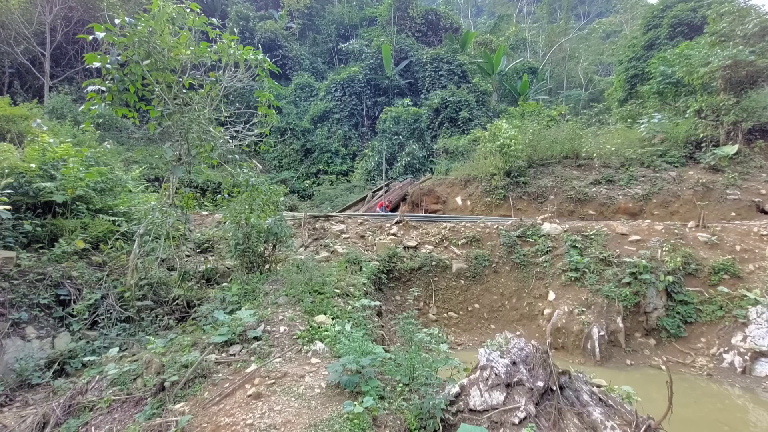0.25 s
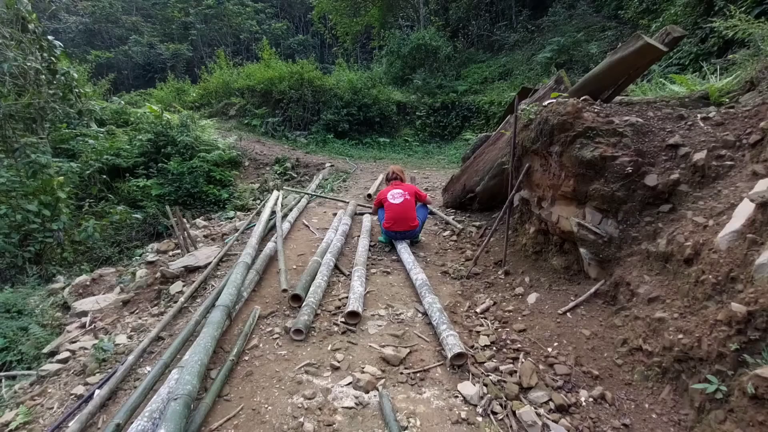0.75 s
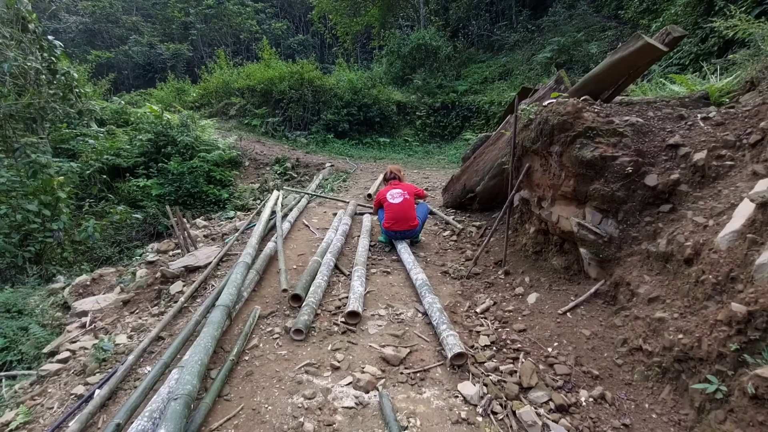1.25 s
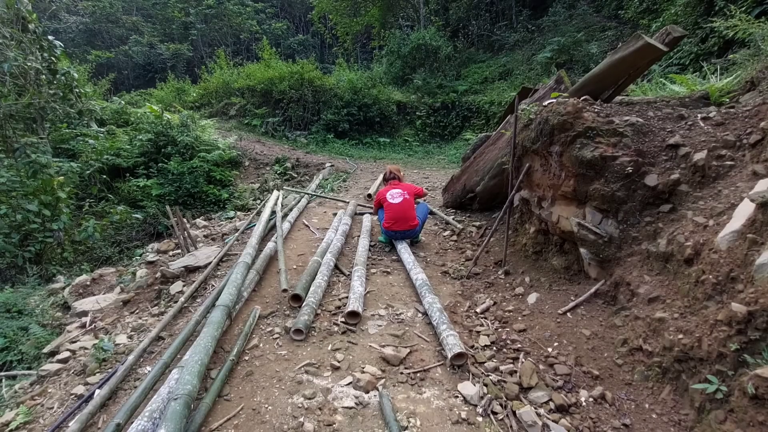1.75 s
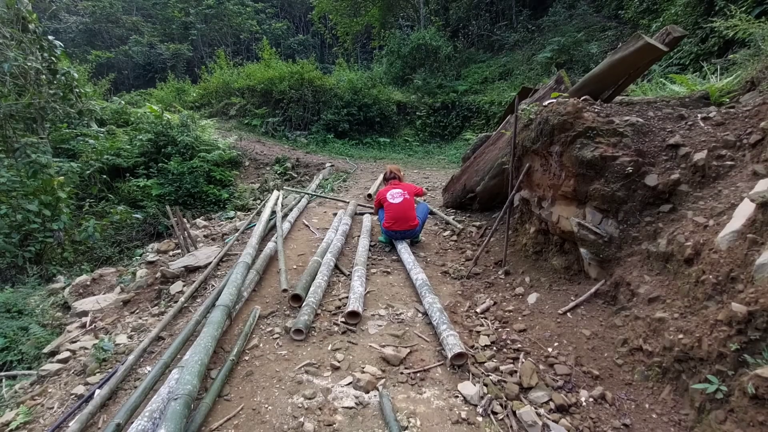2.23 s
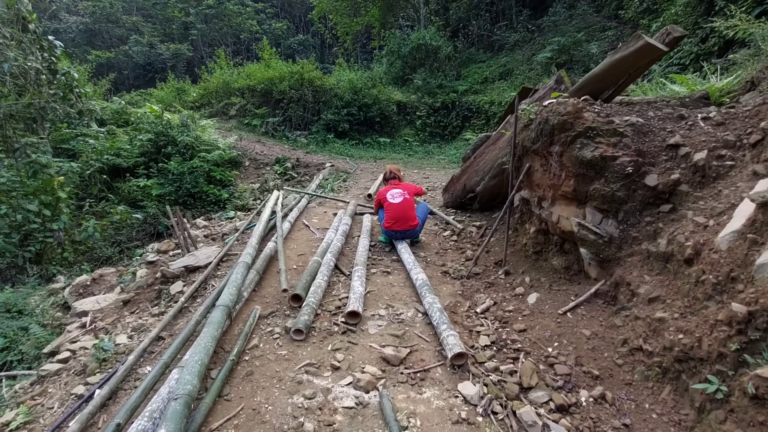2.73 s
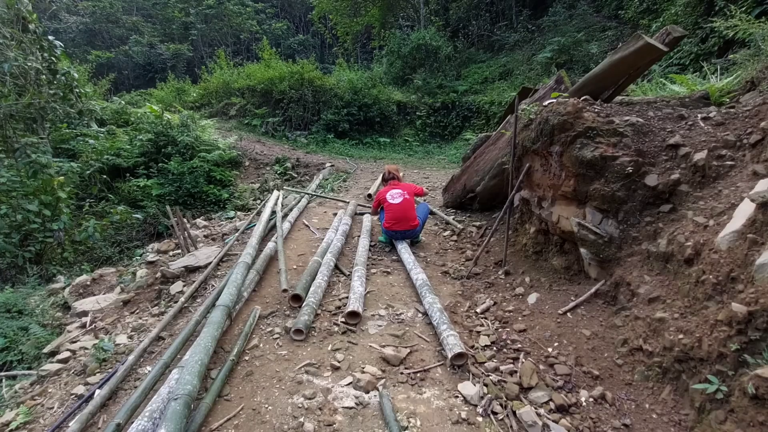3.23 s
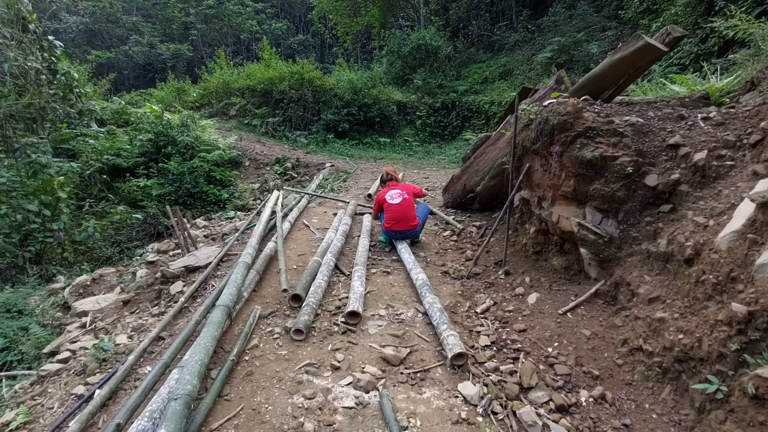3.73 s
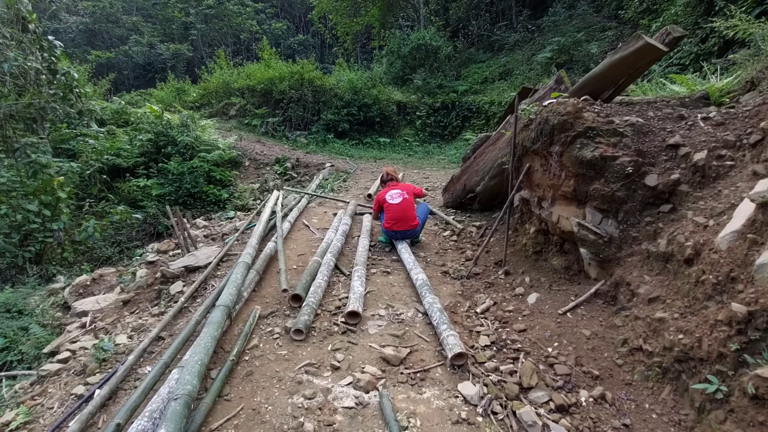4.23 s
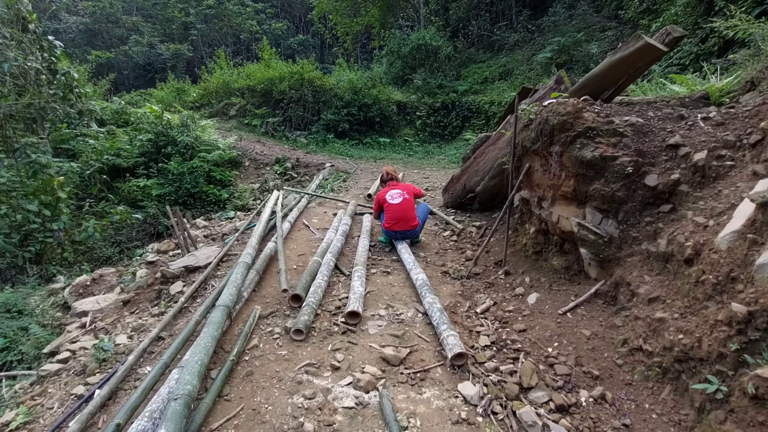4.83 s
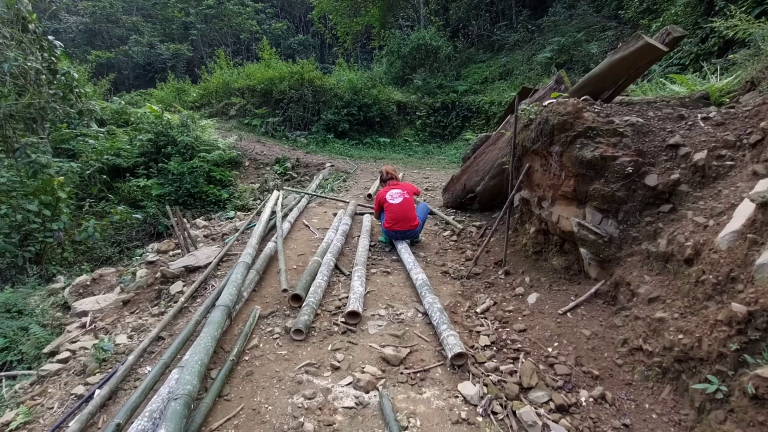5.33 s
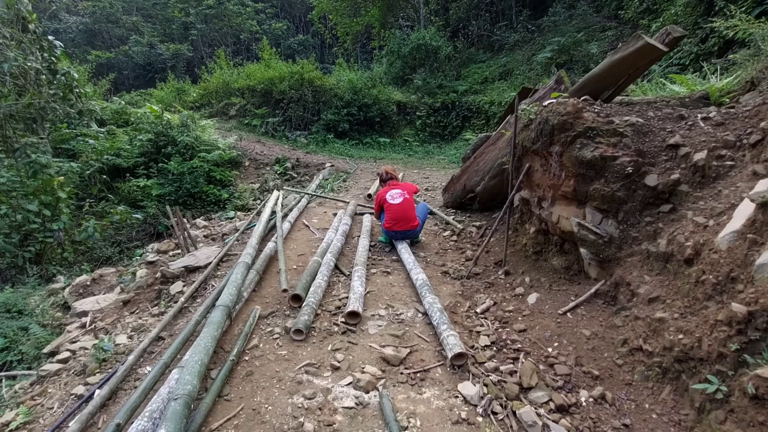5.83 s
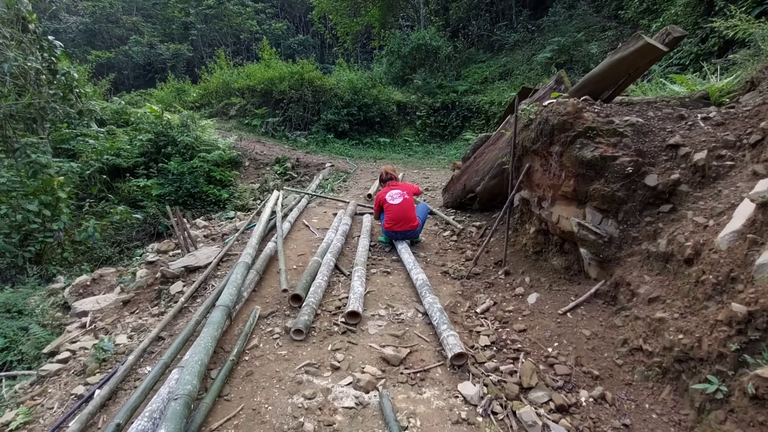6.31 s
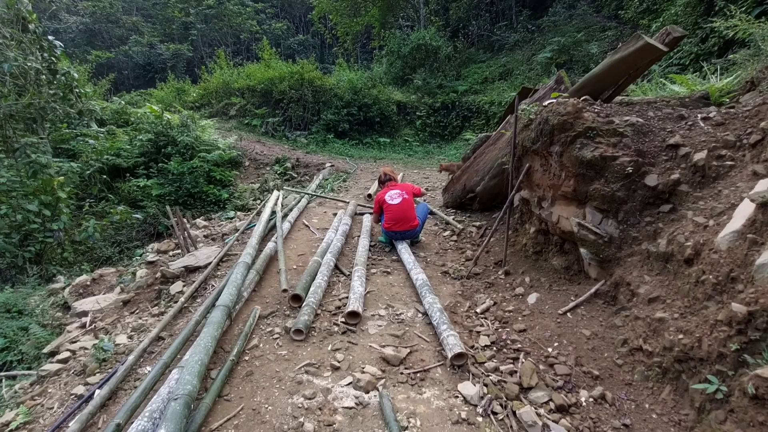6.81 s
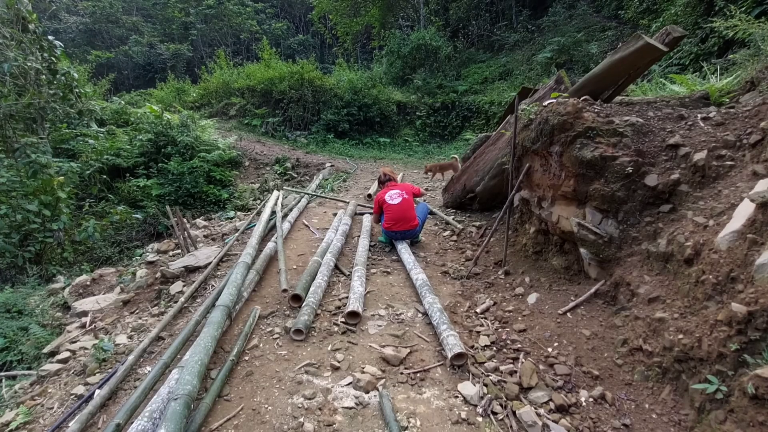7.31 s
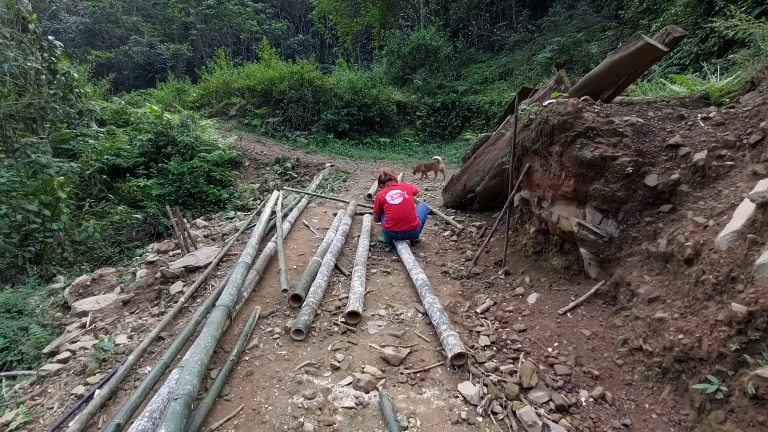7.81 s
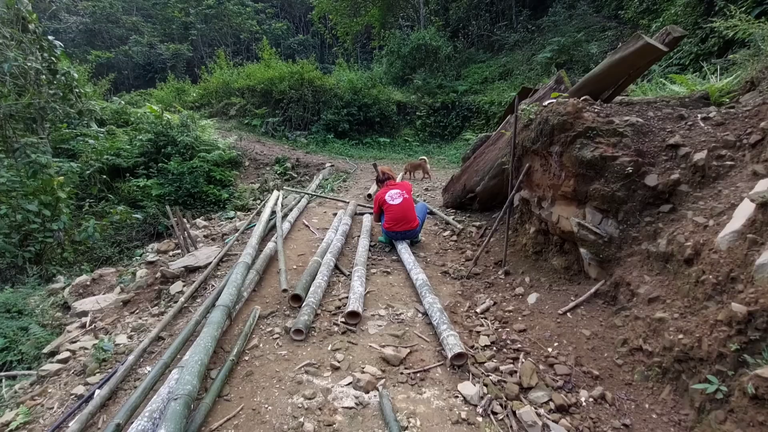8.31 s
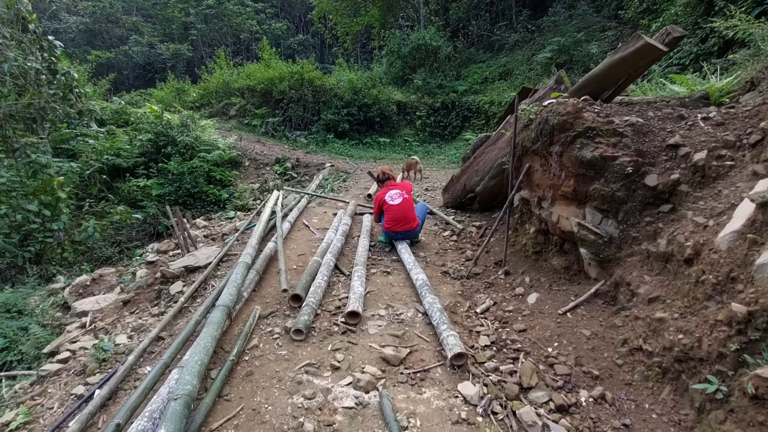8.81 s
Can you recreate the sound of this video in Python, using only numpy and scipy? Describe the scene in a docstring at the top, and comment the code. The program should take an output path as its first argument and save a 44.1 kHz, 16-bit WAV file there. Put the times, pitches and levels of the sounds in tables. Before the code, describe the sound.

Watery rush and thin insect chorus give way to faint outdoor hiss, then sharp hollow knocks of a hand tool on a bamboo pole.

```python
"""A full rush with an insect chorus is heard first; it gives way to a far hiss, maybe a stream, from the left.
Over them a hand tool knocks on a bamboo pole on a wooded slope. Each blow cracks the wall (short modes and
noise), sets the tube's air column and wall ringing (decaying sines) and returns faintly off banks and trees
(banded noise). Rush, hiss and insects are filtered noise with wavering level; small rattles are brief noise
bands."""
import sys
import numpy as np
from scipy import signal
from scipy.fft import rfft, irfft, next_fast_len
from scipy.io import wavfile
from scipy.ndimage import uniform_filter1d

SR = 44100
rng = np.random.default_rng(int(sys.argv[2]) if len(sys.argv) > 2 else 0)


def dump(signal):
    """Clip the signal to [-1, 1] and save it as 16-bit WAV at the path in sys.argv[1]."""
    limited = np.clip(np.atleast_2d(signal).T, -1, 1)
    pcm = np.round(limited * 32767).astype(np.int16)
    wavfile.write(sys.argv[1], SR, pcm)


N = 399409  # length [samples]

# Knocks, each starting 1 ms ahead of its time: (time [s], crack level [dB], brightness [dB/octave],
# contact time scale [ms], low ring level re crack [dB], ring time as share of the free pole's [0-1],
# pitch favoured by the struck spot [Hz], lift at that pitch [dB])
BLOWS = [(1.710, -43, -1, 4.6, -13, 1.0, 784, 6.5), (1.978, -36, -6, 3.6, -22, 1.0, 830, 11),
         (2.436, -16, -0.2, 3.65, -15, 0.87, 1597, 6.5), (2.924, -13, 2, 3.05, -15, 0.89, 690, 4.5),
         (5.151, -41.5, -4, 3.8, -1, 0.76, 810, 12.5), (5.715, -15, -2, 2.67, -5, 0.88, 464, 1.5),
         (5.771, -40, -5, 3.5, -7, 1.0, 850, 11), (6.228, -12.5, -1, 3.9, -4.5, 0.99, 900, 4.5),
         (8.080, -35.5, -8, 3.8, 2.5, 0.54, 1045, 14.5), (8.625, -14.5, 2, 3.5, 1.5, 0.9, 1295, 1)]
# Lasting modes of the tube: (frequency [Hz], level [dB], decay time to -60 dB for the free pole [s])
TUBE_MODES = [(150.5, -16.5, 0.14), (249.2, -1, 0.13), (362.4, -10.5, 0.16), (461.6, -15, 0.11),
              (499.5, -10.5, 0.078), (543, -19.5, 0.083), (619.5, -20, 0.16), (731, -12, 0.13),
              (768, -17.5, 0.098), (851.6, -14, 0.1), (980, -11.5, .07), (1110, -21.5, 0.02),
              (1215, -11.5, 0.079), (1370, -13.5, 0.093), (1670, -14.5, 0.039), (1982, -13, 0.066)]
# Short wall modes that sound while the blade presses: (frequency [Hz], level over the crack colour [dB])
WALL_MODES = [(335, 0.7), (450, 0.9), (710, 3.5), (965, -3), (1300, 1.5), (1620, -0.5), (1920, 0.5),
              (2400, 5.5), (2700, 3.5), (3020, -4), (3450, -3.5), (4080, 3), (4580, 8.5), (5130, -1),
              (5700, -3)]
# Spectrum of the cracking wall: (frequency [Hz], level per Hz [dB])
CRACK_COLOUR = [(30, -36.5), (59, -18.5), (100, -15), (291, 3.5), (700, -1.5), (1320, 0), (1920, -4),
                (2180, -14), (2990, -7), (3760, -14.5), (6620, -32), (15000, -66)]
# Spectrum of the bright snap: (frequency [Hz], level per Hz [dB])
SNAP_COLOUR = [(1500, -27), (3000, -1), (4500, -6), (6600, -8.5), (9000, -22.5), (15000, -36)]
# Likeness of left and right in the crack: (frequency [Hz], likeness [0-1])
CRACK_ALIKE = [(200, 1), (600, 0.56), (1500, 0.5), (3000, 0.27), (8000, 0.3)]
# Scattering bands of the echo: (centre frequency [Hz], level [dB])
ECHO_BANDS = [(300, -9), (500, -0.5), (750, -4.5), (1100, -6.5), (1450, -3), (2100, -5.5), (2700, -8),
              (3400, -6.5), (4300, -13), (5500, -16), (7000, -15), (9000, -29.5)]
# Small rattles and bumps: (time [s], level [dB], centre [Hz], width [Hz], decay time constant [ms])
RATTLES = [(4.02, -53, 480, 150, 12.0), (4.06, -54, 700, 200, 10.0), (4.47, -52, 232, 60, 28),
           (5.943, -48.5, 1280, 1800, 11), (6.233, -41, 7000, 8000, 18), (6.395, -49.5, 1480, 1200, 8.0),
           (8.671, -44.5, 8500, 6000, 7.9)]
# Spectrum of the opening rush: (frequency [Hz], level per Hz [dB])
RUSH_COLOUR = [(18, -53), (30, -23), (133, -2.5), (225, -4), (479, -7), (767, -8.5), (1870, -13),
               (5040, -21.5), (6000, -24.5), (7500, -21.5), (9430, -34.5), (11900, -30), (15500, -36)]
# Likeness of left and right in the rush: (frequency [Hz], likeness [0-1])
RUSH_ALIKE = [(100, 0.92), (350, 0.83), (600, 0.45), (1000, 0.04), (8000, 0)]
# Side balance of the rush: (frequency [Hz], left minus right [dB])
RUSH_BALANCE = [(60, -6), (110, -4.5), (200, -3.5), (380, -1), (700, -1), (1290, 0.5), (2380, -0.5),
                (4400, -0.5), (8120, 0), (15000, -1)]
# Spectrum of the far hiss: (frequency [Hz], level per Hz [dB])
HISS_COLOUR = [(18, -60), (30, -24), (90, -14.5), (123, -6), (173, -10), (225, -3), (299, -7.5),
               (561, -7.5), (1020, -12), (1820, -14.5), (5740, -23), (6720, -19.5), (8720, -29),
               (12600, -33), (15500, -35.5)]
# Likeness of left and right in the hiss: (frequency [Hz], likeness [0-1])
HISS_ALIKE = [(100, 0.96), (200, 0.95), (600, 0.73), (1400, 0.49), (2500, 0.3), (5000, 0.01), (10000, 0)]
# Side balance of the hiss: (frequency [Hz], left minus right [dB])
HISS_BALANCE = [(60, -7), (110, -5), (200, -5), (380, -2), (700, 0), (1290, 0.0), (2380, 2), (4400, 1.0),
                (8120, 3.5), (15000, -1)]
# Dips of the hiss after three hard blows: (start [s], end [s], level change [dB])
DIPS = [(3.02, 4.05, -2.5), (6.32, 7.52, -2.5), (8.717, 9.5, -2.5)]
# Insect choruses: (start [s], end [s], fade [s], centre [Hz], width [Hz], level [dB])
INSECTS = [(-.2, 0.882, 0.049, 7000, 300, -69.5), (4.0, 4.95, .15, 12100, 3500, -79),
           (4.5, 4.95, 0.11, 12000, 3000, -75)]

FULL_BLOW_DB, KNOCK_PAN_DB = -15, -1.6  # reference blow level; left minus right of the crack
WALL_DB, FIBRE_DB, GRIT_DB = -13, -8, 6  # wall and fibre levels; spread of the fibre grains
SHIVER_S = 0.015  # decay time constant
SNAP_SHARE, SNAP_DELAY_S = 0.79, 0.0012  # snap contact as share of the blow's
SPOT_OCTAVES, FAVOUR_OCTAVES = 0.44, 0.46  # spread of the favoured pitch in crack and in ring
RING_SWELL_S, RING_HOLD_S = 0.0068, 0.1  # both at 250 Hz, before the further terms in ring()
RING_LAG_S = 0.00013  # left after right
ECHO_RISE_S, ECHO_T60_S = 0.019, 0.53
ECHO_PATCHY_DB, ECHO_WIDTH = 4.5, 0.21  # scale of the level walk; bandwidth as share of the centre
# Level at a full blow, and change for every dB that a blow is softer
SHIVER_DB, SHIVER_PER_DB = -10.5, 0.3587
ECHO_DB, ECHO_PER_DB = -33, 0.3
# Snap level at brightness 0, and change per dB/octave of brightness
SNAP_DB, SNAP_PER_BRIGHTNESS = -20, 3
# Ring tilt [dB/octave] at low ring level 0 dB, and change per dB of that level
RING_TILT_DB, RING_TILT_PER_DB = -1.2, -0.52
RUSH_DB, RUSH_END_S, RUSH_FADE_S = -54, 0.941, 0.13
GURGLE_HZ, GURGLE_WIDTH_HZ, GURGLE_DB = 425, 280, -6.5  # level re the rush
HISS_DB, HISS_START_S, HISS_FADE_S = -57, 0.73, 0.22
HISS_LEAD_S, DIP_FADE_S = 0.00048, 0.16
SOFT_TOP, TOP_HZ = 0.65, 15600  # saturation ceiling (full scale 1); treble cutoff


def blows():
    """Superposition: each knock sums crack, ring and echo; softer blows have relatively more shiver and echo."""
    before, length = SR // 50, SR // 2
    t = (np.arange(length) - before) / SR
    out = np.zeros((2, N + length))
    pan = amp(np.array([[KNOCK_PAN_DB], [-KNOCK_PAN_DB]]) / 2)
    for time_s, db, bright, contact_ms, ring_db, share, favour_hz, lift_db in BLOWS:
        softer = FULL_BLOW_DB - db
        snap_db = SNAP_DB + SNAP_PER_BRIGHTNESS * bright
        shiver_db = SHIVER_DB + SHIVER_PER_DB * softer
        knock = pan * crack(t, contact_ms / 1000, bright, favour_hz, lift_db, snap_db, shiver_db)
        # where the low ring is weak the upper modes stand out
        ring_tilt_db = RING_TILT_DB + RING_TILT_PER_DB * ring_db
        knock += amp(ring_db) * ring(t, ring_tilt_db, favour_hz, lift_db, share)
        knock += amp(ECHO_DB + ECHO_PER_DB * softer) * echo(t, bright)
        start = int(time_s * SR) - before - SR // 1000
        out[:, start:start + length] += amp(db) * knock
    return out[:, :N]


def crack(t, contact_s, tilt_db, favour_hz, lift_db, snap_db, shiver_db):
    """Impact excitation: wall modes jolt, fibres give way in uneven grains and shiver; the edge snaps briefly."""
    grains = np.repeat(rng.standard_normal(len(t) // 32 + 1), 32)[:len(t)]
    grit = amp(GRIT_DB * grains)
    elapsed = np.maximum(t, 0)
    shiver_rise = 1 - np.exp(-(elapsed / contact_s / 2) ** 2)
    shiver = amp(shiver_db) * shiver_rise * np.exp(-elapsed / SHIVER_S)

    # brightness tilts the treble; the struck spot lifts its own band
    hz = np.geomspace(30, 16000, num=60)
    spot = lift_db * np.exp(-(np.log2(hz / favour_hz) / SPOT_OCTAVES) ** 2)
    db = along(CRACK_COLOUR, hz) + tilt_db * np.log2(1 + hz / 1000) + spot
    colour = np.transpose([hz, db])

    mode_hz, mode_db = np.transpose(WALL_MODES)[:, :, None]
    chance = rng.standard_normal((len(WALL_MODES), 4)).T[:, :, None]
    size = amp(along(colour, mode_hz) + mode_db + 2.0 * chance[0])
    phase = 2 * np.pi * mode_hz * (1 + 0.015 * chance[1]) * t + 10 * chance[2]
    skew = chance[3] * mode_hz / 1200  # high modes beam unevenly towards the two sides
    wall = np.array([np.sum(size * np.sin(phase + side * skew), axis=0) for side in (0.5, -0.5)])
    wall /= np.sqrt(np.mean(size ** 2))

    press = bite(t, contact_s)
    fibres = pair(amp(FIBRE_DB) * press * grit + shiver, colour, CRACK_ALIKE)
    snap = pair(bite(t - SNAP_DELAY_S, SNAP_SHARE * contact_s), SNAP_COLOUR, CRACK_ALIKE)
    return amp(WALL_DB) * press * wall + fibres + amp(snap_db) * snap


def ring(t, tilt_db, favour_hz, lift_db, share):
    """Tube resonance: low modes swell slower and hold a while as the wave runs down the tube and back."""
    hz, db, t60 = np.transpose(TUBE_MODES)[:, :, None]
    chance = rng.standard_normal((len(TUBE_MODES), 4)).T[:, :, None]
    lift = lift_db * np.exp(-(np.log2(hz / favour_hz) / FAVOUR_OCTAVES) ** 2)
    size = amp(db + tilt_db * np.log2(np.minimum(hz, 1200) / 250) + lift + 1.53 * chance[0])
    swell_s = RING_SWELL_S * np.sqrt(250 / hz) + 0.0025
    hold_s = RING_HOLD_S * share * np.minimum(250 / hz, 1) ** 2
    out = []
    for side in (1, 0):  # left lags right
        elapsed = np.maximum(t - side * RING_LAG_S, 0)
        # high modes beam unevenly, so their phase differs between the sides
        phase = 0.36 * chance[2] + side * chance[3] * hz / 1500
        tone = np.sin(2 * np.pi * hz * (1 + 0.003 * chance[1]) * elapsed + phase)
        swell = 1 - np.exp(-(elapsed / swell_s) ** 1.2)
        aged = np.sqrt(elapsed ** 2 + hold_s ** 2) - hold_s  # decay starts gently
        decay = np.exp(-np.log(1000) * aged / (t60 * share))
        out.append(np.sum(size * tone * decay * swell, axis=0))
    return np.array(out)


def echo(t, tilt_db):
    """Diffuse scattering off banks and leaves: bands come and go independently, mostly unlike on the two sides."""
    elapsed = np.maximum(t, 0)
    rise = 1 - np.exp(-(elapsed / ECHO_RISE_S) ** 2)
    shape = rise * np.exp(-np.log(1000) * elapsed / ECHO_T60_S)
    out = np.zeros((2, len(t)))
    for hz, db in ECHO_BANDS:
        patchy = shape * amp(ECHO_PATCHY_DB * walk(44.2, size=len(t)))
        band = pair(patchy, peak(hz, ECHO_WIDTH * hz), ((300, 0.75), (1500, 0.077)))
        out += amp(db + tilt_db * np.log2(hz / 1000)) * band
    return out


def bite(t, contact_s):
    """Contact force: builds smoothly, peaks near 1 after about two time scales, then lets go."""
    u = np.maximum(t, 0) / contact_s
    return u ** 3 * np.exp(3 - 1.518 * u) / 8


def rattles():
    """Brief damped excitation: splinters, chips and loose poles tick as decaying noise bands."""
    t, out = np.arange(SR // 5) / SR, np.zeros((2, N))
    for time_s, db, hz, width, decay_ms in RATTLES:
        shape = (1 - np.exp(-t / 0.0027)) * np.exp(-t / decay_ms * 1000)
        start = int(time_s * SR)
        out[:, start:start + len(t)] += amp(db) * pair(shape, peak(hz, width), CRACK_ALIKE)
    return out


def rush():
    """Broadband turbulence: a wide wavering noise with a lumpy low gurgle like near water."""
    wide = pair(amp(1.0 * walk(11.7)), RUSH_COLOUR, RUSH_ALIKE, balance=RUSH_BALANCE)
    gurgle_colour = peak(GURGLE_HZ, GURGLE_WIDTH_HZ)
    gurgle = pair(amp(4.0 * walk(30)), gurgle_colour, RUSH_ALIKE, balance=RUSH_BALANCE)
    return (wide + amp(GURGLE_DB) * gurgle) * amp(RUSH_DB) * window(-9, RUSH_END_S, RUSH_FADE_S)


def hiss():
    """Interaural delay: the common part of a far noise leads on the left; its level dips at set times."""
    db = HISS_DB + sum(depth_db * window(start, end, DIP_FADE_S) for start, end, depth_db in DIPS)
    far = pair(amp(0.27 * walk(4.3)), HISS_COLOUR, HISS_ALIKE, lead_s=HISS_LEAD_S, balance=HISS_BALANCE)
    return far * amp(db) * window(HISS_START_S, 99, HISS_FADE_S)


def insects():
    """Amplitude modulation: far choruses are flickering bands of noise that fade in or out."""
    out = np.zeros((2, N))
    for start, end, fade, hz, width, db in INSECTS:
        flicker = window(start, end, fade) * amp(1.2 * walk(24.6))
        out += amp(db) * pair(flicker, peak(hz, width), ((1, 0), (2, 0)))
    return out


def pair(shape, colour, alike, tilt_db=0., lead_s=0., balance=((1, 0), (2, 0))):
    """Partial coherence: two shaped noises share a common part, are coloured alike and kept near the shape's RMS."""
    size = shape.shape[-1]
    n = next_fast_len(size)
    hz = np.arange(n // 2 + 1) * SR / n
    common, left, right = rfft(rng.standard_normal((3, size)) * shape, n)
    likeness = np.clip(along(alike, hz), 0, 1)
    shared, own = np.sqrt(likeness), np.sqrt(1 - likeness)
    left = shared * common + own * left
    # a linear phase delays the common part on the right
    right = shared * common * np.exp(-2j * np.pi * hz * lead_s) + own * right
    gain = amp(along(colour, hz) + tilt_db * np.log2((hz + 1) / 1000))
    gain /= np.sqrt(np.mean(gain ** 2))
    side = amp(along(balance, hz) / 2)
    return irfft(gain * np.array([left * side, right / side]), n)[:, :size]


def peak(hz, width):
    """Band-pass spectrum: steep skirts around one centre, as (frequency [Hz], level [dB])."""
    return [(max(hz - 2 * width, hz / 4), -40), (hz - width / 2, -3), (hz, 0),
            (hz + width / 2, -3), (hz + 2 * width, -40)]


def walk(rate, size=N):
    """Slow random modulation: levels held 1 / rate s and smoothed twice by moving averages."""
    hold = int(SR / rate)
    steps = np.repeat(rng.standard_normal(size // hold + 1), hold)
    return uniform_filter1d(uniform_filter1d(steps, hold), hold)[:size]


def window(start, end, fade):
    """Linear gating: rises after start, is 1 between, and falls to 0 at end (all in s)."""
    t = np.arange(N) / SR
    return np.clip(np.minimum(t - start, end - t) / fade, 0, 1)


def along(table, hz):
    """Logarithmic frequency scale: interpolates a (frequency [Hz], value) table."""
    f, v = np.transpose(table)
    return np.interp(np.log(hz + 1), np.log(f), v)


def amp(db):
    """Decibel law: amplitude gain of a level in dB."""
    return 10 ** (np.asarray(db) / 20)


def scene():
    """Linear superposition: knocks and rattles over the background."""
    return blows() + rattles() + rush() + hiss() + insects()


def record(dry):
    """Saturation and low-pass filtering: rounds the loudest peaks and cuts the top treble."""
    soft = SOFT_TOP * np.tanh(dry / SOFT_TOP)
    # order 10, 0.2 dB ripple, 70 dB stop band
    low_pass = signal.ellip(10, 0.2, 70, TOP_HZ, fs=SR, output="sos")
    return signal.sosfilt(low_pass, soft)


dry = scene()
out = record(dry)
dump(out)
```